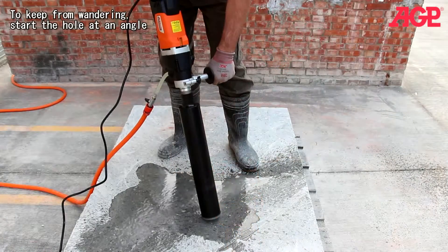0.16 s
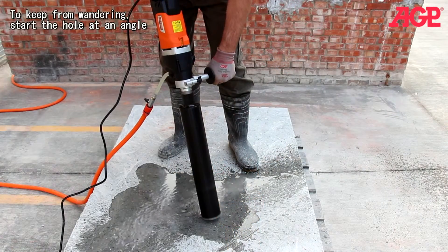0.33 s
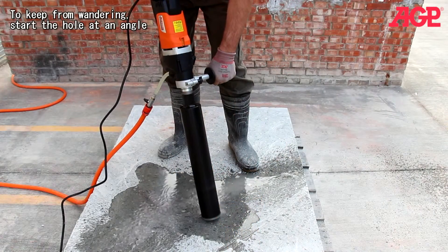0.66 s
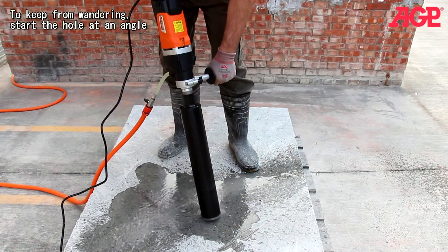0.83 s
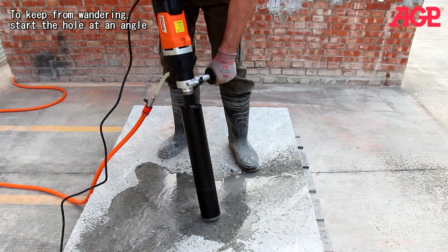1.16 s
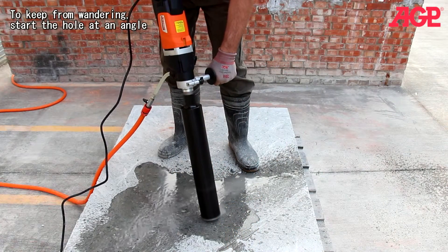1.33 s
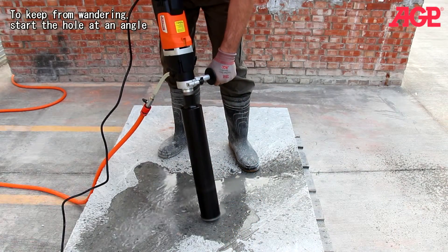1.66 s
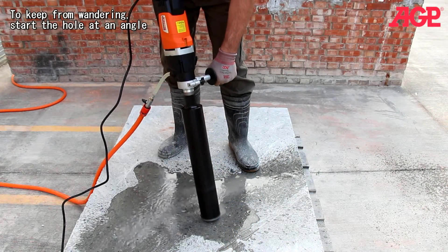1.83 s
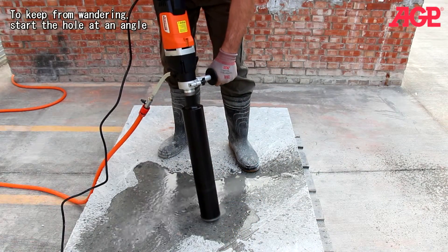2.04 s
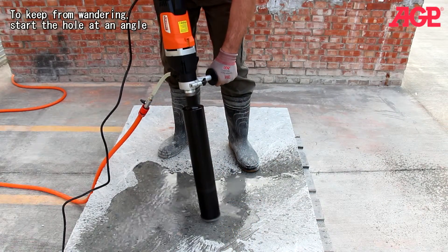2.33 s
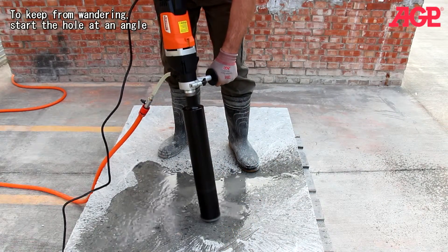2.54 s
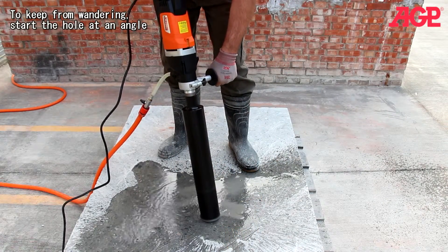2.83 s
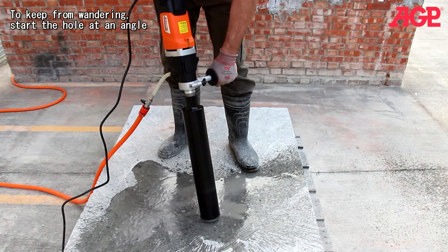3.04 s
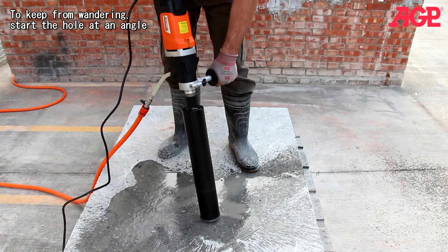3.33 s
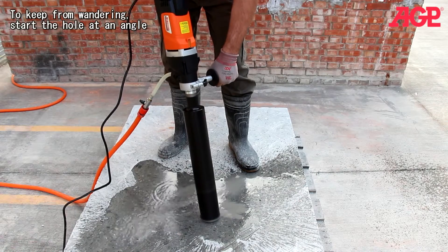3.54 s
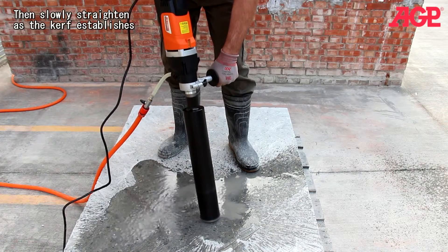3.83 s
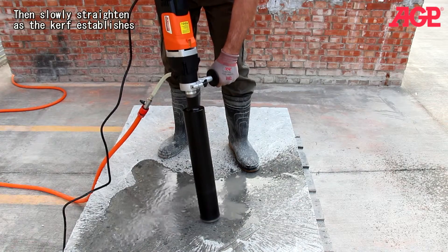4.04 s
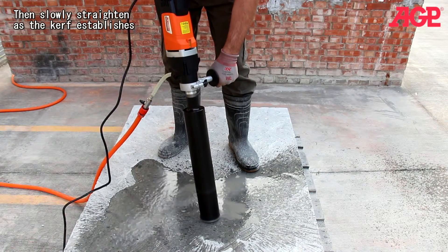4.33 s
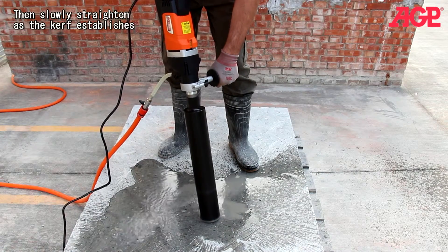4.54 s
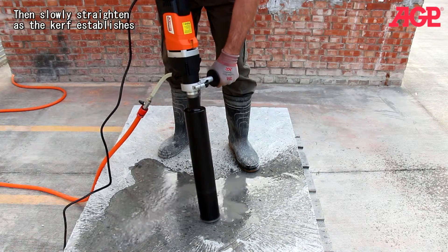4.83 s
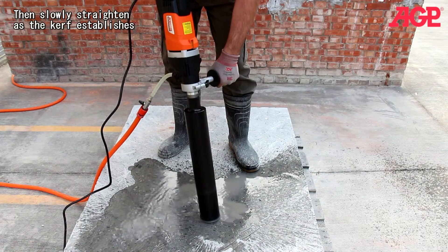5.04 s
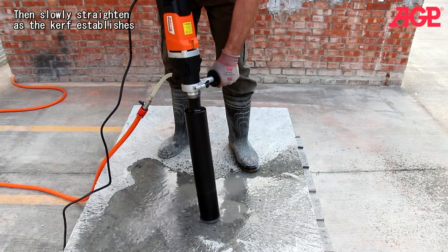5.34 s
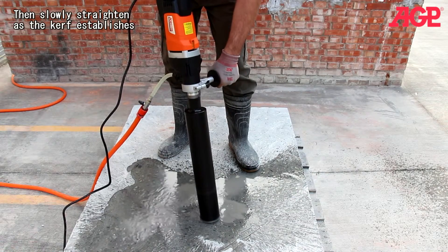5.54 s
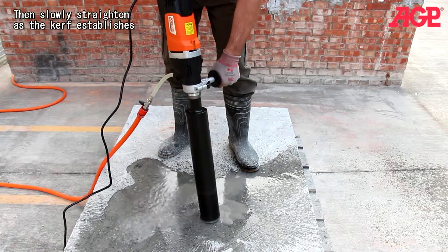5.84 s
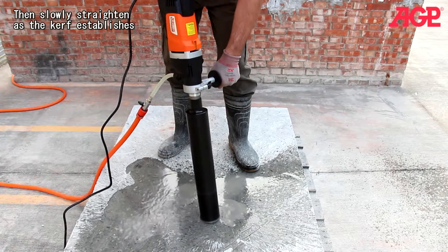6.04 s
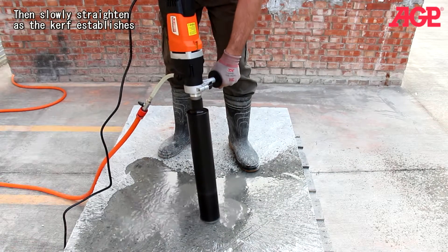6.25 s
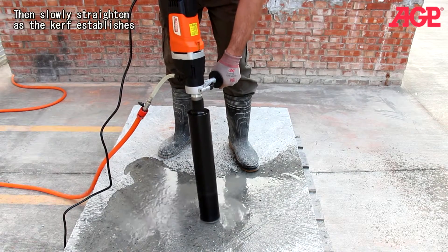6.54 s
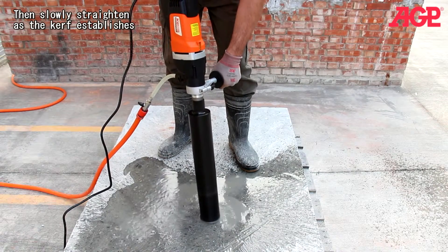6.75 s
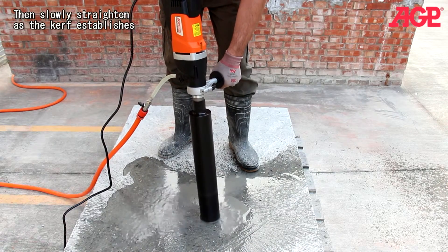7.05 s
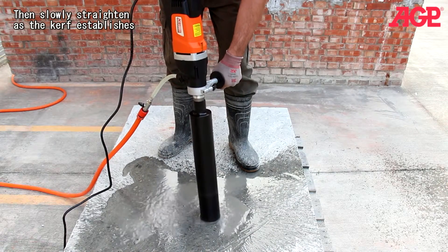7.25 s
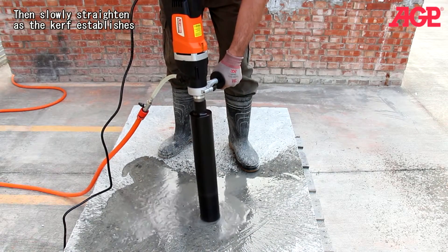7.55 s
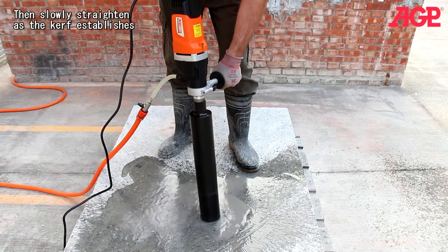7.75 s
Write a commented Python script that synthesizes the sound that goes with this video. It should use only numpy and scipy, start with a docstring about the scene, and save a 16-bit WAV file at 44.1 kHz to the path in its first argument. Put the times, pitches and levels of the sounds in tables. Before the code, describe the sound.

Continuous harsh, ringing scrape of a rotating steel barrel in a concrete slab, fluttering quickly, growing fuller and lower before its ring becomes duller.

```python
"""A handheld core drill grinds a wet ring into a concrete slab, out of doors, heard in mono.
One force drives it all: noise from crushed grit, stronger once a turn as the diamond crown bites.
It excites resonances of steel barrel, crown, slab and frame; a hum follows the passing segments.
The ring changes colour as the barrel is straightened into the kerf. Faint gusts of air lie below."""
import sys
import numpy as np
from scipy import signal
from scipy.fft import rfft, irfft
from scipy.io import wavfile
from scipy.ndimage import uniform_filter1d

SR = 44100
rng = np.random.default_rng(int(sys.argv[2]) if len(sys.argv) > 2 else 0)


def file_out(sig):
    """Save sig as 16-bit WAV at sys.argv[1]."""
    # one column per channel
    cols = np.atleast_2d(sig).T
    # limit, then scale
    lim = np.clip(cols, -1, 1)
    pcm = np.round(lim * 32767).astype(np.int16)
    wavfile.write(sys.argv[1], SR, pcm)


N = 347949

# air on the microphone, gusts over the calm: centre t/s, half length/s, level/dB
GUSTS = [(.65, .15, -68), (1.18, 0.072, -61), (1.78, .08, -55.5), (2.15, 0.22, -60), (4.507, 0.31, -61),
         (5.95, .08, -65), (6.8, 0.43, -65)]
# rotation of the spindle: t/s, turns made so far
TURNS = [(0, 0), (.75, 17.73), (1.5, 35.22), (2.24, 52.19), (2.49, 57.85), (3.24, 74.51), (4.49, 102.81),
         (5.49, 125.19), (6.24, 142.07), (6.98, 158.14), (7.89, 177.83)]
# wobble of the force once a turn: t/s, standard deviation of the level/dB before chance variation
WOBBLE = [(0, 2), (.95, 1.5), (1.4, 1), (2.4, 2), (3.4, 1), (3.9, 1), (4.9, 1.1), (5.4, 0.9), (5.9, .5),
          (6.4, 1.5), (7.89, 0.67)]
# single bites of a segment, strong to barely felt: t/s, force relative to the steady grind, level/dB
BITES = [(0.0454, 0), (0.2397, 2), (0.334, -3), (0.667, 2), (1.232, 1), (1.341, -5), (2.0537, -12),
         (2.1884, -3), (2.3057, 0), (2.5267, 2), (2.6174, -1), (4.4917, -9), (5.4745, -31), (6.4163, -32),
         (6.499, -2), (6.906, 7), (7.2355, -7), (7.5597, 3), (7.7962, -13)]
# hand pressure rocks as the barrel is steadied: t/s, swell of the grinding hiss, level/dB
PRESSURE = [(0, -1), (.5, -1), (.76, 0.5), (1.1, -1), (1.5, 1.5), (2.0, -.5), (2.25, 1), (2.65, -1.5),
            (2.9, 1), (3.1, -1), (3.5, 1.5), (3.75, -1.5), (4.25, 0.5), (4.45, 0.5), (5.3, -.5),
            (5.55, 0.5), (6.1, -0.5), (7.05, 1.5), (7.3, 0.5), (7.89, 1)]
# the crown sinks into the kerf: t/s, depth (0-1)
DEPTH = [(0, 0.03), (1.1, 0.07), (3.9, 0.37), (4.6, 0.43), (5.6, 0.58), (6.3, 0.58), (7.89, .62)]
# share of the rings damped by the kerf wall: t/s, share (0-1)
GRIP = [(0, 0), (5, .1), (6.3, .25), (6.9, .6), (7.2, .95), (7.89, 1)]
# segment hum swells or fades: centre t/s, half length/s, height, level/dB
HUM_SWELLS = [(1.2, .15, 3), (2.2, .15, -8), (3.55, .06, -5), (4.3, .3, 3.5), (5.2, 0.13, 4),
              (5.9, 0.25, 5.5), (7.05, .15, -5)]
# its third harmonic does so on its own: centre t/s, half length/s, height, level/dB
THIRD_SWELLS = [(.3, .2, -4), (1.45, .25, 7.5), (2.2, .15, -3), (3.3, 0.13, 4), (6.45, .15, 5),
                (7.1, 0.28, -3)]
# the drill body shudders, slab and frame growl louder: centre t/s, half length/s, height, level/dB
SHUDDERS = [(1.4, 0.17, 2), (1.9, 0.14, 2.5), (2.4, .15, 2), (2.75, 0.076, 5), (4.1, 0.081, 6),
            (4.6, 0.17, 1), (5.45, 0.082, 3.5), (5.85, 0.06, 0), (6.4, 0.25, 1), (7.2, .12, 1),
            (7.75, 0.064, 5.5)]
# resonances of slab and frame: f/Hz, width/Hz, relative level/dB
SLAB_MODES = [(250, 45, -10), (359, 36, -3), (637, 40, -4), (859, 40, -5), (916, 23, -6.5),
              (1068, 78, -4.5)]
# broad rumble under those resonances: f/Hz, relative level per Hz/dB
RUMBLE = [(90, -32), (130, -17.5), (200, -13.5), (300, -18), (500, -5.5), (800, -12), (1300, -13),
          (1800, -6)]
# weaker modes of barrel and crown: f/Hz
STEEL_HZ = [2160, 2630, 2683, 2790, 2890, 4960, 5060, 5225, 5545, 5658, 5797, 5883, 6060, 6360, 6720, 6900,
            7010, 7630, 8027, 8340, 8500, 8710, 9109, 9378, 9550, 9770, 10045, 10280, 11420, 13135]
# the same modes in order: width/Hz, shallow level per Hz/dB, deep level per Hz/dB, before the swells
STEEL = [(31, -93.5, -50.5), (11.9, -55.5, -72), (18.1, -59, -53.5), (11.7, -50, -61), (17, -59.5, -56.5),
         (79, -63, -90), (25, -66, -78), (12, -62, -56.5), (29, -51.5, -60), (22, -53.5, -68),
         (21, -59.5, -57), (25, -65.5, -68), (68, -58.5, -61.5), (90, -58, -65), (40, -65.5, -48),
         (64, -54, -56), (64, -57.5, -44.5), (48, -58, -75), (50, -57, -71), (80, -68, -45.5),
         (54, -75, -44), (90, -57.5, -55), (68, -59, -67), (40, -90, -70), (90, -55, -58), (45, -65, -65),
         (53, -94, -56), (110, -57, -52.5), (140, -59, -65), (400, -73.5, -54)]
# hiss of grit and slurry between the modes: f/Hz, shallow level per Hz/dB, deep level per Hz/dB,
# before the swells
GRIT = [(1330, -86, -74.5), (2370, -70, -64), (3420, -68, -66), (4700, -64.5, -65), (5230, -77, -72),
        (6470, -68, -63.5), (6940, -65.5, -64.5), (9000, -67, -63.5), (11400, -68, -64),
        (13100, -62.5, -72.5), (14500, -62.5, -77), (15800, -66, -63)]
# split modes of the four loud barrel rings, one list a ring: f/Hz, width/Hz, relative level/dB
RING_MODES = [
    [(1770, 60, -13), (1822, 22, -5), (1882, 16, 0)],
    [(3088, 30, -2), (3132, 18, 0), (3202, 20, -4.5)],
    [(3737, 14, 0), (3850, 11, -1.5)],
    [(4545, 30, -8), (4594, 24, 0), (4645, 30, -7), (4710, 34, -.5)],
]
# factor by which the kerf wall widens the modes, one a ring
GRIP_WIDENS = [1.4, 4, 1.5, 9]
# the four rings: shallow level/dB, deep level/dB, loss in the kerf wall's grip/dB,
# share of the pressure swing
RING_LEVELS = [(-36, -29, -0.5, 0.17), (-28, -27, 8.5, 1), (-29, -33.5, 5.5, 0.34), (-27, -21, 5, 0.49)]
# a ring flares or sags as the contact point suits it or not: centre t/s, ring (rounded, halves to the
# even number; only 0-3 sound), half length/s, height, level/dB
FLARES = [(.2, 3, 0.081, 3), (.68, 0.5, 0.07, 3.5), (.75, 3, 0.15, 3.5), (1.702, 1.5, 0.23, 2),
          (2.3, 3, .3, -2), (2.744, 1.5, 0.14, 4.5), (2.85, 2, 0.1, 2), (3.1, 1, 0.17, -3.5),
          (3.748, 0, 0.39, 3.5), (4.35, 3, .3, 2), (4.39, 1.5, 0.074, 5), (4.7, 4, 0.26, -1.5),
          (5.192, 1, 0.076, 6), (5.603, 0, 0.15, 1.5), (5.802, 4, .4, 3), (6.296, 1, 0.057, 5),
          (6.6, 1.5, 0.23, -4.5), (6.855, -0.5, 0.18, 1.5), (7.862, 0, 0.063, 4.5)]

CALM_DB, WIND_HZ = -67, 61
SEGMENTS, BITE_DECAY_S = 7, .008
HEAVY_FOLLOWS = 0.76    # share of the force's bursts followed by slab, frame and barrel
# levels at depth 0 and depth 1, dB
RUMBLE_DB, HUM_DB, THIRD_DB, FRAME_DB = (-40, -31), (-53.5, -43), (-49, -43), (-53.5, -36.5)
GRIP_RUMBLE_DB, GRIP_FRAME_DB, GRIP_HUM_DB = 2.5, 4, -8     # change at full grip
HUM_BLUR_HZ = 7
FRAME_HZ, FRAME_WIDTH_HZ = 321, 11
SLAB_SHUDDERS = 0.46    # share of the shudder in the slab rumble
CROWD_SPACING_HZ, CROWD_WIDTH_HZ, CROWD_SPREAD_DB = 100, 45, 3
CUTOFF_HZ = 15750


def from_db(db):
    """Amplitude ratio is ten to the power of level over 20."""
    return 10 ** (np.asarray(db) / 20)


def rms_one(x):
    """Scaling by the root mean square gives unit mean power."""
    return x / np.sqrt(np.mean(x ** 2) + 1e-20)


def in_time(rows):
    """Linear interpolation makes each column a function of time."""
    s, *columns = np.transpose(rows)
    return [np.interp(np.arange(N) / SR, s, column) for column in columns]


def by_depth(levels, depth):
    """Linear interpolation of level between its shallow and its deep value."""
    shallow_db, deep_db = levels
    return shallow_db + depth * (deep_db - shallow_db)


def swells(rows):
    """Superposition of Gaussian rises and falls, rows of (centre s, half length s, height)."""
    t = np.arange(0, N / SR + .01, .005)
    total = sum(height * np.exp(-((t - s) / half) ** 2) for s, half, height in rows)
    return np.interp(np.arange(N) / SR, t, total)


def drift(rate_hz):
    """Low-pass filtered noise: two equal poles leave slow chance of standard deviation about 1."""
    r = np.exp(-2 * np.pi * rate_hz * 20 / SR)      # computed at every 20th sample
    noise = rng.standard_normal(N // 20 + 2002)
    slow = signal.lfilter([1], [1, -2 * r, r * r], noise)[2000:]    # after the run-in
    return np.interp(np.arange(N) / 20, np.arange(len(slow)), rms_one(slow - slow.mean()))


def resonate(x, hz, width):
    """Damped resonance: a pole pair whose radius sets the bandwidth, with gain 1 at the peak."""
    r = np.exp(-np.pi * width / SR)
    zeros = np.array([1, 0, -1]) * (1 - r * r) / 2
    poles = [1, -2 * r * np.cos(2 * np.pi * hz / SR), r * r]
    return signal.lfilter(zeros, poles, x)


def colour(x, hz, level_db):
    """Spectral shaping: level runs straight over log frequency, closed outside the table."""
    f = np.maximum(np.arange(N // 2 + 1) * SR / N, 1)
    gain_db = np.interp(np.log(f), np.log(hz), level_db, left=-200, right=-200)
    return irfft(rfft(x) * from_db(gain_db), N)


def steadied(x, share):
    """Automatic levelling: slow chance swells of a noisy tone are partly evened out."""
    power = uniform_filter1d(x ** 2, size=SR // 8) + 1e-12
    return rms_one(x / power ** (share / 2))


def wind():
    """Moving air at a microphone: low-frequency noise, lumpy in level and rising in gusts."""
    level = from_db(CALM_DB) + swells([(s, half, from_db(db)) for s, half, db in GUSTS])
    level = level * from_db(2.5 * drift(4.5))
    band = signal.butter(2, [15, WIND_HZ], "band", fs=SR, output="sos")
    return level * rms_one(signal.sosfilt(band, rng.standard_normal(N)))


def spindle():
    """Rotation is the integral of speed, and the speed changes smoothly."""
    turns, = in_time(TURNS)
    speed = uniform_filter1d(np.gradient(turns), size=SR // 4)
    return np.cumsum(speed)


def grinding_force(turns, wobble_db):
    """Crushing of grit is a noise force, about 0 dB per Hz on average, modulated by the rotating crown."""
    jumps = np.zeros(N)
    jumps[[int(s * SR) for s, db in BITES]] = from_db(np.array(BITES)[:, 1])
    chips = (rng.random(N) < 90 / SR) * rng.uniform(0, 0.6, N)      # small chance bites, about 90 a second
    decay = np.exp(-1 / (BITE_DECAY_S * SR))
    tail = signal.lfilter([1], [1, -decay], jumps + chips + 1e-18)

    # the high segment grabs once a turn and lets go slowly
    since_grab = (turns + 0.13) % 1
    grab = uniform_filter1d(np.exp(-2.5 * since_grab), size=SR // 500)
    grab = (grab - grab.mean()) / grab.std()
    grab = grab * from_db(np.clip(2.5 * drift(16), -6, 2))      # no two turns alike

    thumps_db = 0.92 * np.cos(2 * np.pi * SEGMENTS * turns)
    swell_db = wobble_db * grab + thumps_db + 0.14 * drift(34)
    gain = rms_one(from_db(swell_db) * (1 + tail))
    return gain * rng.standard_normal(N) * np.sqrt(SR / 2)


def softened(force):
    """Heavy bodies respond less to brief bursts: short-time power is partly evened out."""
    power = uniform_filter1d(force ** 2, size=SR // 100) / (SR / 2)
    return force / power ** (np.clip(1 - HEAVY_FOLLOWS, 0, 1) / 2)


def hum(turns, multiple_count, hum_db):
    """Periodic contact: a tone at a multiple of the segment rate, blurred by chance amplitude and phase."""
    angle = 2 * np.pi * SEGMENTS * multiple_count * turns
    blur_hz = HUM_BLUR_HZ * multiple_count
    wavering = drift(blur_hz) * np.cos(angle) + drift(blur_hz) * np.sin(angle)
    return from_db(hum_db) * steadied(wavering, share=0.33)


def frame(force, frame_db):
    """Forced vibration of the drill body: two resonances in cascade at one low frequency."""
    ring = resonate(resonate(force, FRAME_HZ, FRAME_WIDTH_HZ), FRAME_HZ, 47)
    return from_db(frame_db) * steadied(ring, share=0.15)


def slab(force, rumble_db):
    """Modal superposition: low resonances of slab and frame over a broad rumble from the same force."""
    body = sum(from_db(db) * resonate(force, hz, width) for hz, width, db in SLAB_MODES)
    body = signal.sosfilt(signal.butter(2, [180, 1600], "band", fs=SR, output="sos"), body)
    grain = force * rng.choice([-1, 1], N)      # same bursts, unrelated fine grain
    rumble = colour(grain, *np.transpose(RUMBLE))
    return from_db(rumble_db) * rms_one(body + rumble)


def crowd(force):
    """High modal density: narrow shell modes at chance pitches above 6 kHz, of mean power gain 1 to 15 kHz."""
    grit = force * rng.choice([-1, 1], N)       # same bursts, unrelated fine grain
    f = np.arange(0, SR / 2, 4.)
    tops = 6000 + np.cumsum(CROWD_SPACING_HZ * rng.uniform(.4, 1.6, size=120))
    signs = (-1) ** np.arange(len(tops))
    strengths = from_db(CROWD_SPREAD_DB * rng.standard_normal(len(tops))) * signs
    gain = sum(g / (1 + 2j * (f - hz) / CROWD_WIDTH_HZ) for hz, g in zip(tops, strengths))
    mean_power = np.mean(np.abs(gain[(f > 6000) & (f < 15000)]) ** 2)
    gain = np.where(f < 6000, 1, gain / np.sqrt(mean_power))
    return irfft(rfft(grit) * np.interp(np.arange(N // 2 + 1) * SR / N, f, gain), N)


def patchy(x, patchy_db):
    """Wandering contact round the crown: each band of the spectrum flickers independently in level."""
    spectrum, f = rfft(x), np.arange(N // 2 + 1) * SR / N
    band = np.searchsorted([2500, 5000, 7500, 9000, 11000, 13000], f)
    return sum(from_db(patchy_db * drift(13.0)) * irfft(spectrum * (band == k), N)
               for k in np.unique(band))


def crown(force, depth):
    """Modal excitation by noise: weaker steel modes and grit hiss pass from shallow to deep levels."""
    out = 0
    for k, (hz, (width, *levels)) in enumerate(zip(STEEL_HZ, STEEL)):
        level_db = by_depth(levels, depth) + 1.5 * drift(3)
        out = out + from_db(level_db) * resonate(force, hz, width) * (-1) ** k     # signs alternate
    hz, shallow_db, deep_db = np.transpose(GRIT)
    # straightening the barrel excites another set of upper modes: an equal-power crossfade
    out = out + np.sqrt(1 - depth) * colour(crowd(force), hz, shallow_db)
    out = out + np.sqrt(depth) * colour(crowd(force), hz, deep_db)
    return patchy(out, patchy_db=1.01)


def split_ring(force, modes, wider):
    """Rotation splits a shell mode into close modes that beat; damping widens them."""
    return rms_one(sum(from_db(db) * resonate(force, hz, width * wider) * (-1) ** k
                       for k, (hz, width, db) in enumerate(modes)))


def barrel(force, depth, grip, pressure_db):
    """Shell resonance: four loud split rings, increasingly damped by contact with the kerf wall."""
    out = 0
    for ring, (modes, widens, row) in enumerate(zip(RING_MODES, GRIP_WIDENS, RING_LEVELS)):
        *levels, loss_db, pressure_share = row
        free = split_ring(force, modes, wider=1)
        damped = split_ring(force, modes, wider=widens)
        level_db = by_depth(levels, depth) - loss_db * grip + pressure_share * pressure_db
        flares = [(s, half, db) for s, which, half, db in FLARES if round(which) == ring]
        level_db = level_db + swells(flares)
        out = out + from_db(level_db) * steadied((1 - grip) * free + grip * damped, share=0.13)
    return out


def scene():
    """Superposition of all sources, the same in both channels."""
    depth, grip = (np.clip(in_time(rows)[0], 0, 1) for rows in (DEPTH, GRIP))
    pressure_db, = in_time(PRESSURE)
    turns = spindle()
    force = grinding_force(turns, *in_time(WOBBLE))
    heavy = softened(force)
    shudder_db = swells(SHUDDERS)

    fade_db = GRIP_HUM_DB * grip
    hum_db = by_depth(HUM_DB, depth) + fade_db + swells(HUM_SWELLS)
    third_db = by_depth(THIRD_DB, depth) + fade_db + swells(THIRD_SWELLS)
    hums = hum(turns, 1, hum_db) + hum(turns, 3, third_db)

    rumble_db = by_depth(RUMBLE_DB, depth) + GRIP_RUMBLE_DB * grip + SLAB_SHUDDERS * shudder_db
    frame_db = by_depth(FRAME_DB, depth) + GRIP_FRAME_DB * grip + shudder_db
    lows = wind() + hums + slab(heavy, rumble_db) - frame(heavy, frame_db)    # frame enters in opposite phase to the slab

    hiss = from_db(pressure_db) * crown(force, depth)
    mono = lows + hiss + barrel(heavy, depth, grip, pressure_db)
    return np.array([mono, mono])


def record(dry):
    """Elliptic low-pass filtering cuts the top steeply."""
    return signal.sosfilt(signal.ellip(14, .3, 80, CUTOFF_HZ, fs=SR, output="sos"), dry)


dry = scene()
out = record(dry)
file_out(out)
```